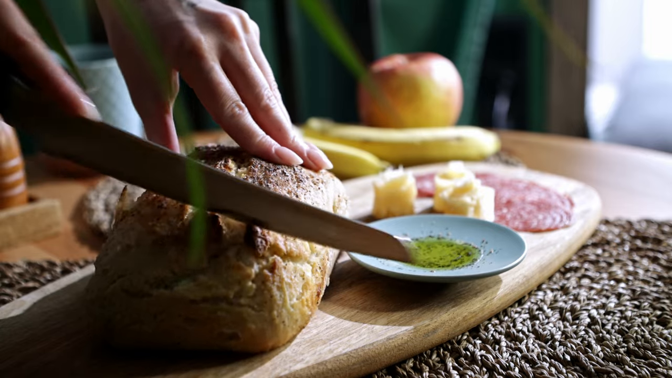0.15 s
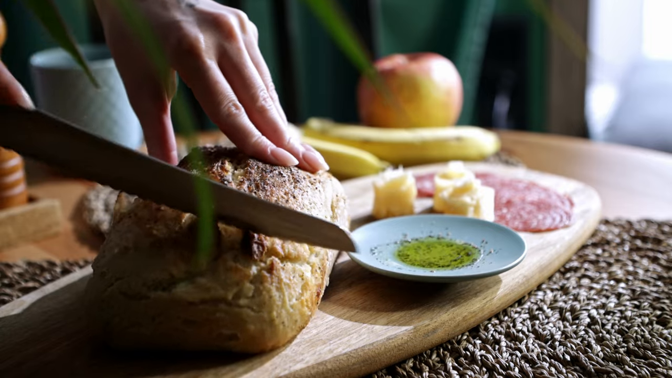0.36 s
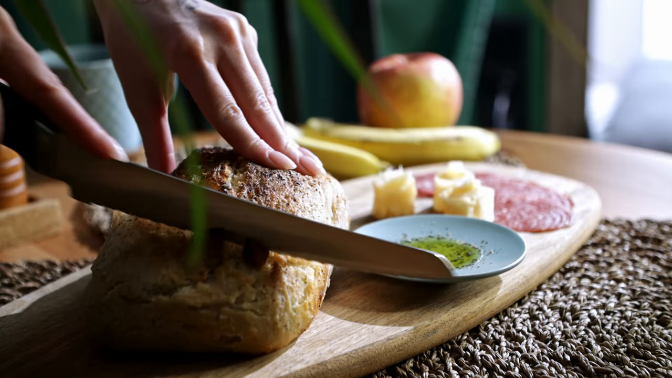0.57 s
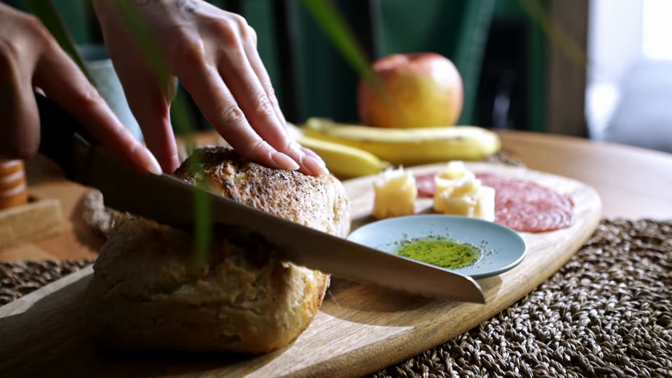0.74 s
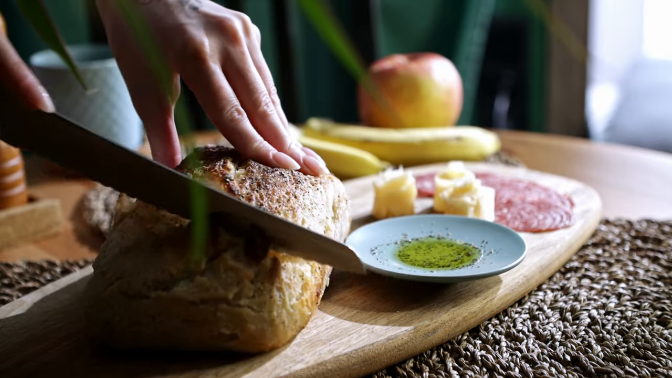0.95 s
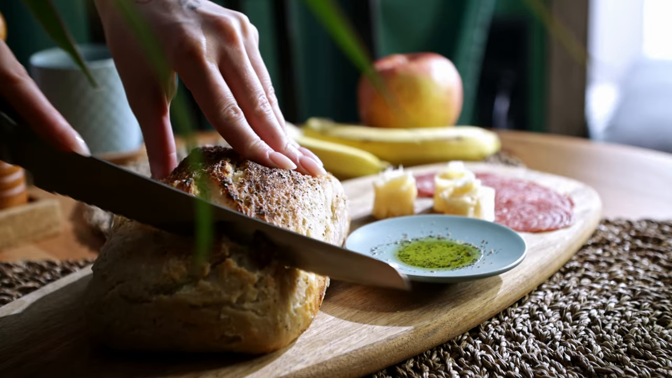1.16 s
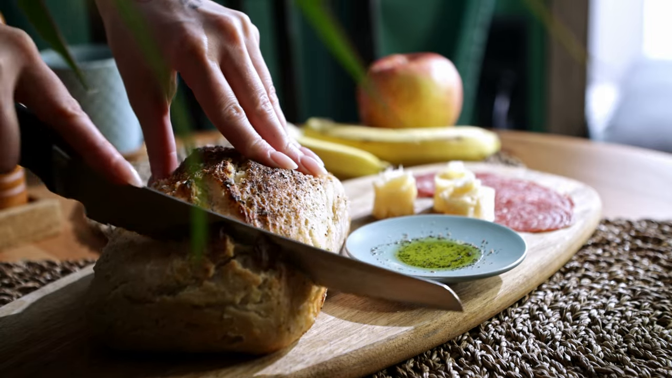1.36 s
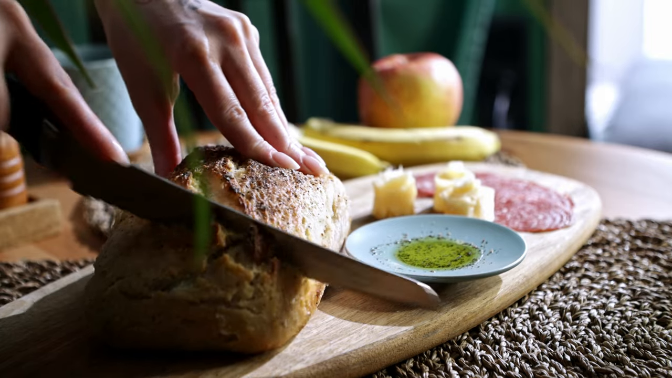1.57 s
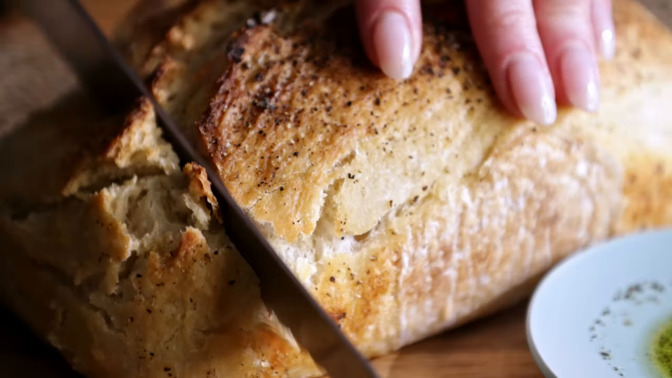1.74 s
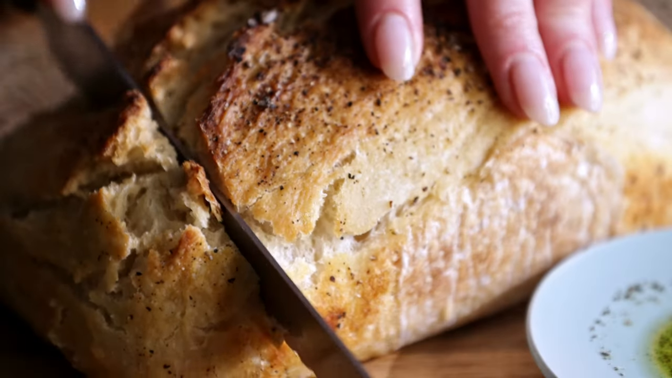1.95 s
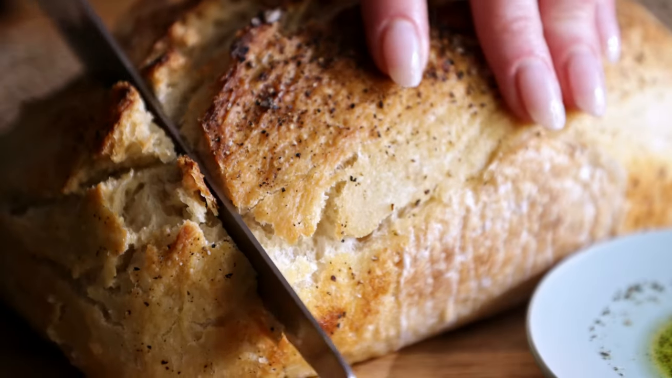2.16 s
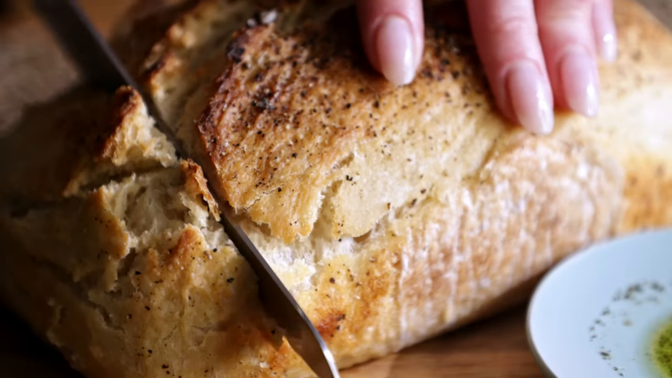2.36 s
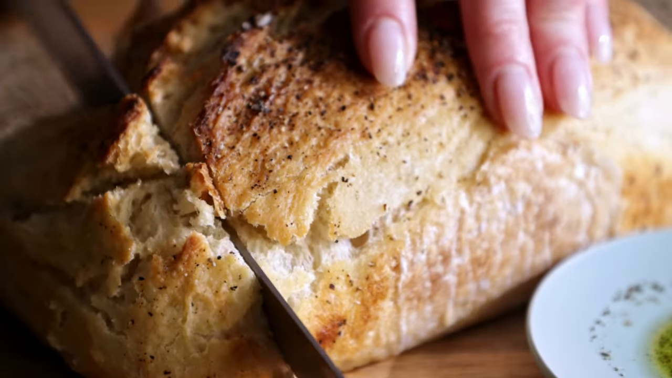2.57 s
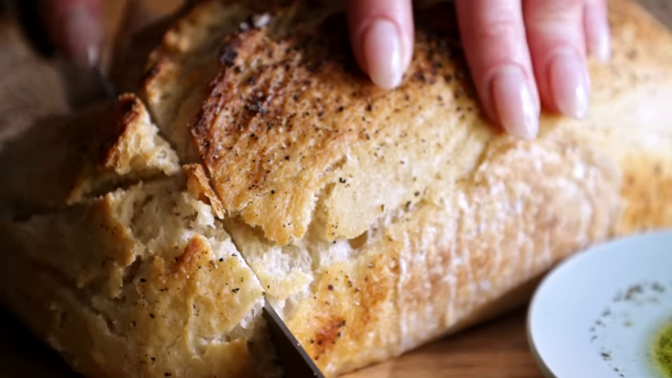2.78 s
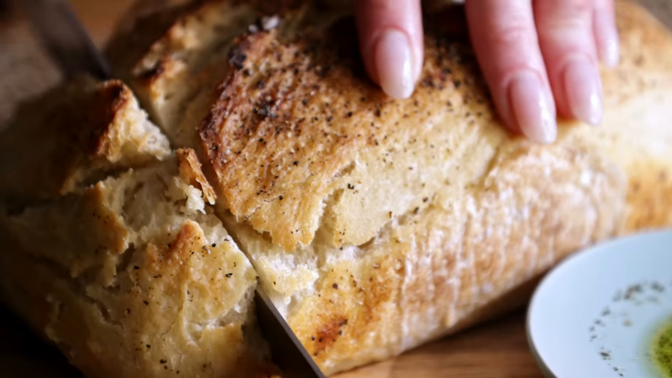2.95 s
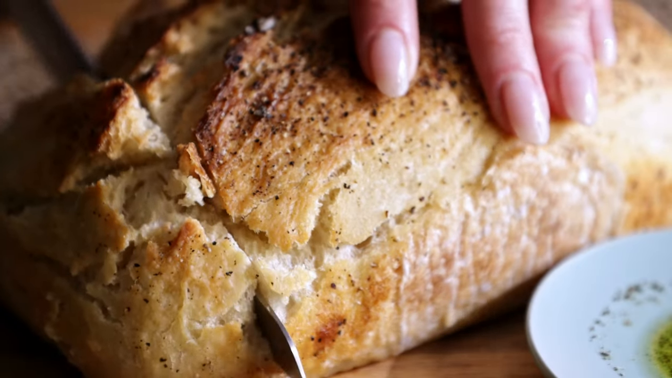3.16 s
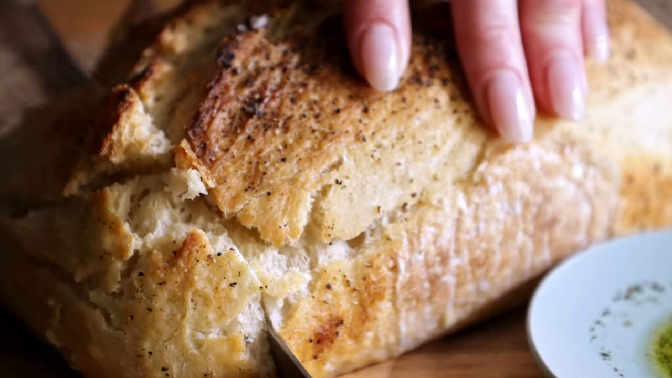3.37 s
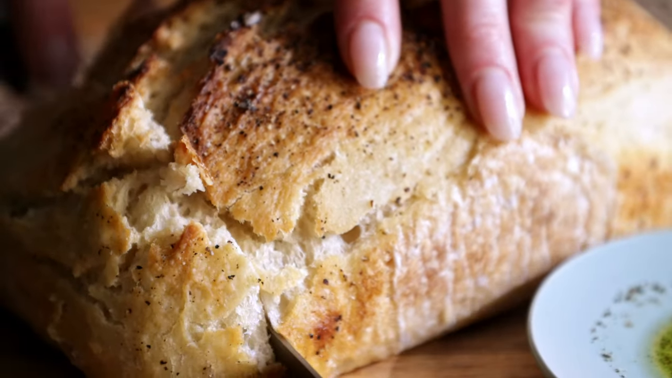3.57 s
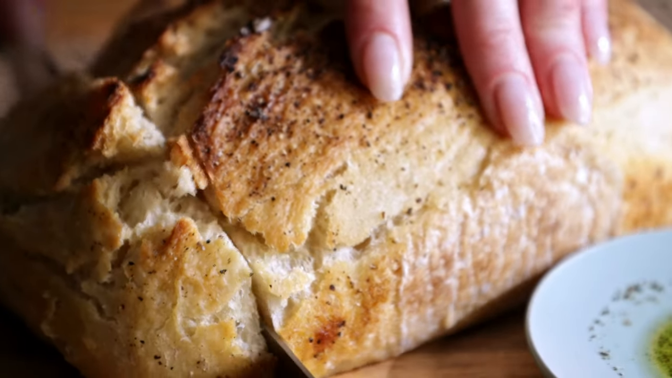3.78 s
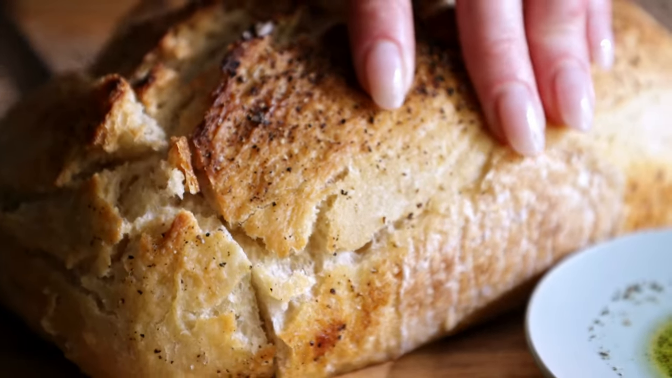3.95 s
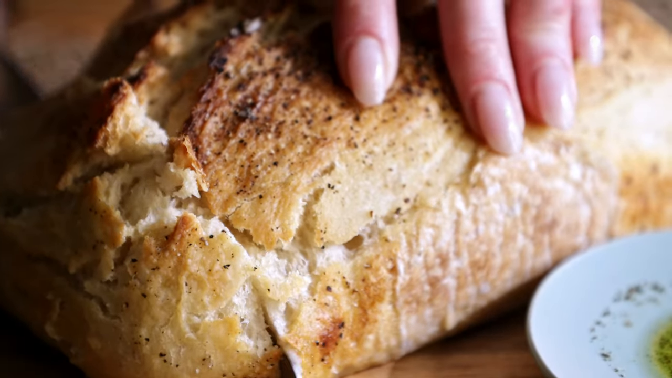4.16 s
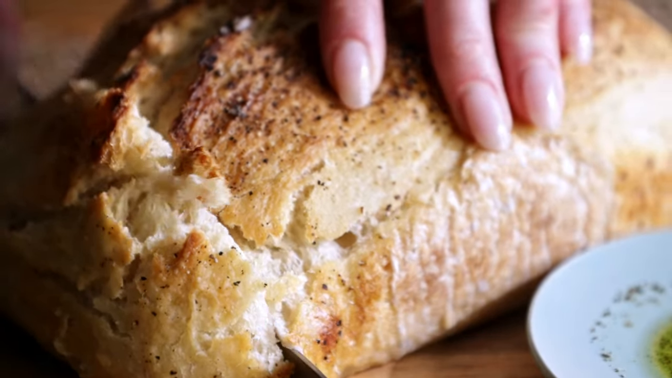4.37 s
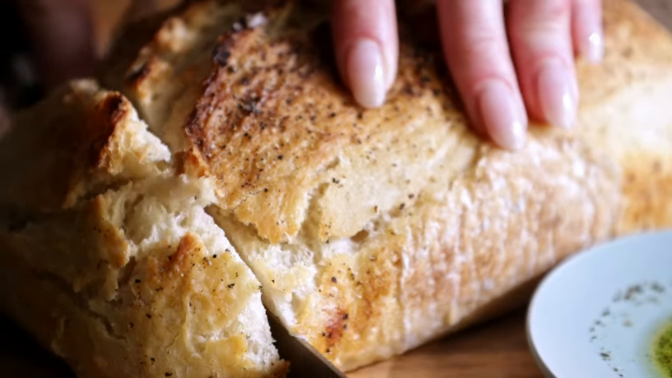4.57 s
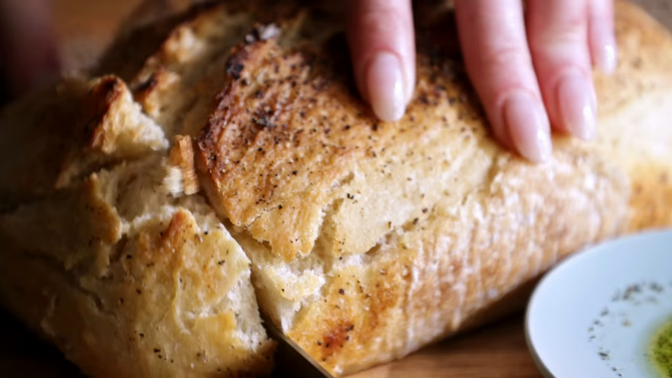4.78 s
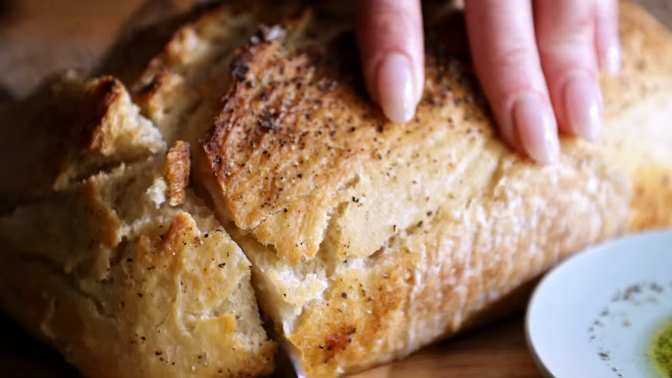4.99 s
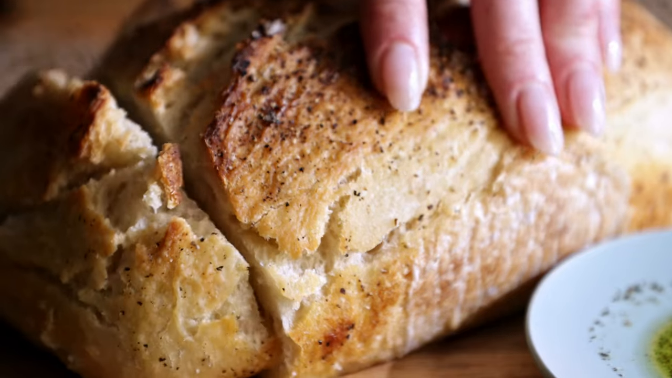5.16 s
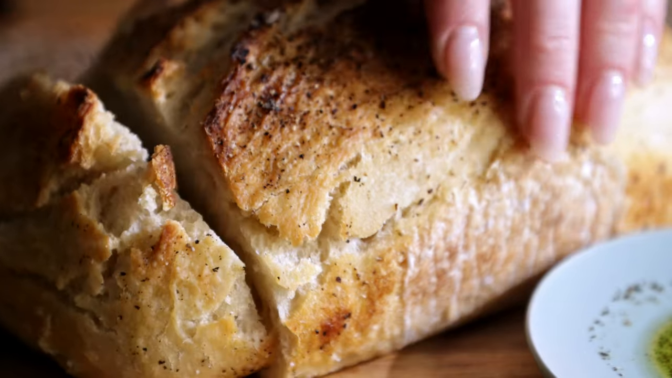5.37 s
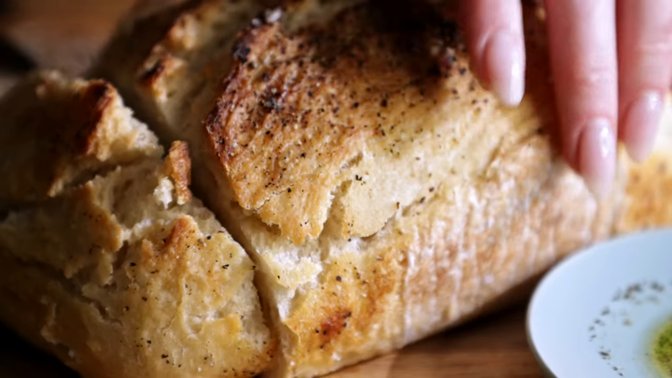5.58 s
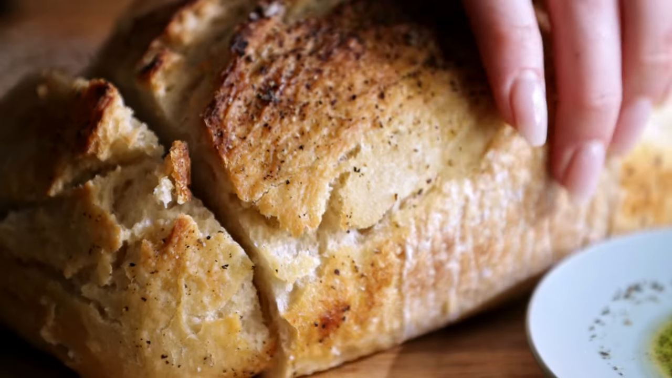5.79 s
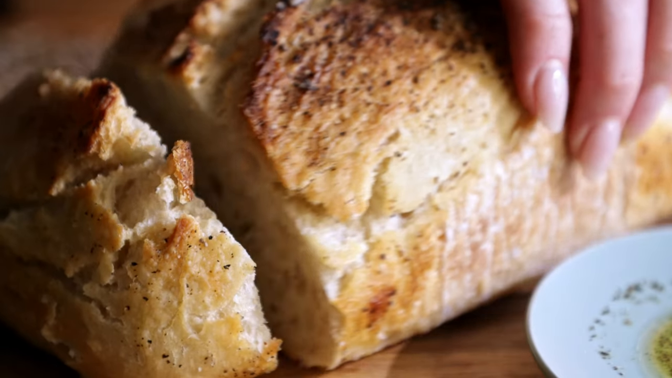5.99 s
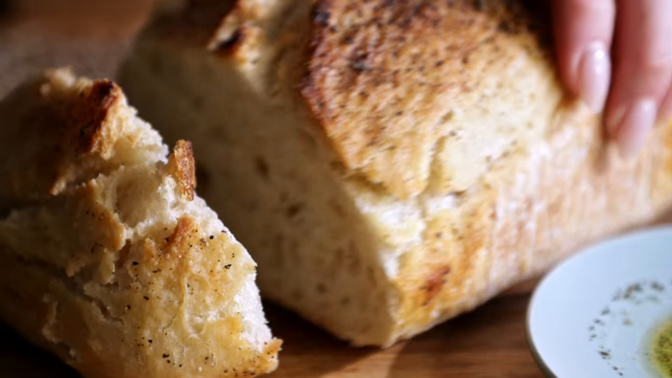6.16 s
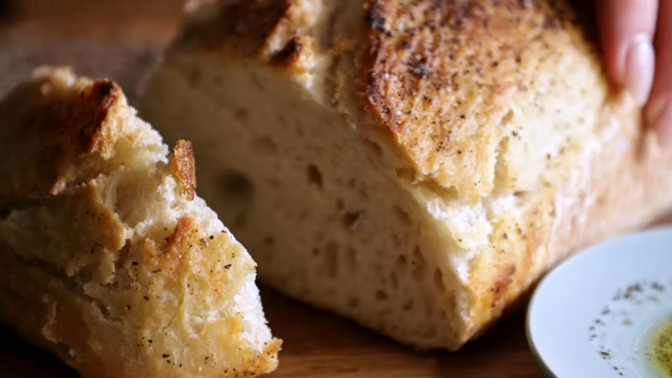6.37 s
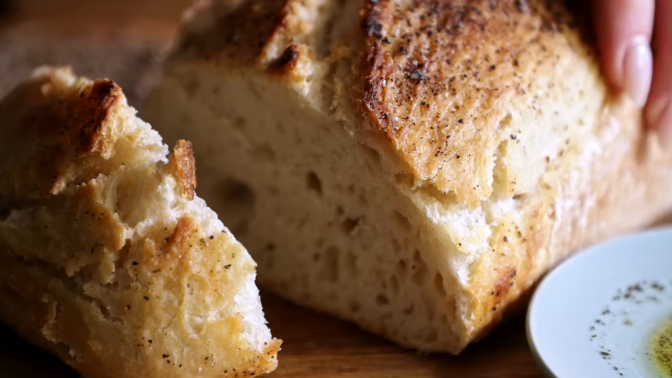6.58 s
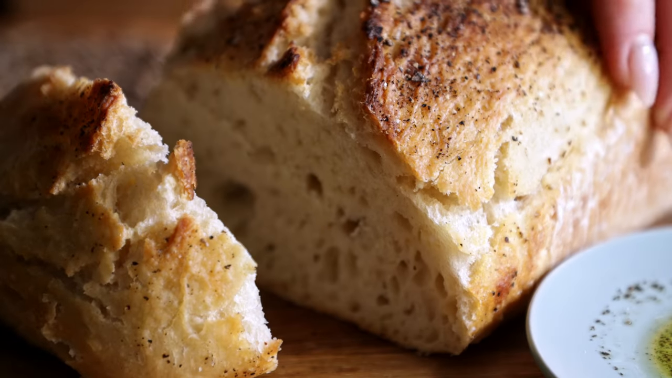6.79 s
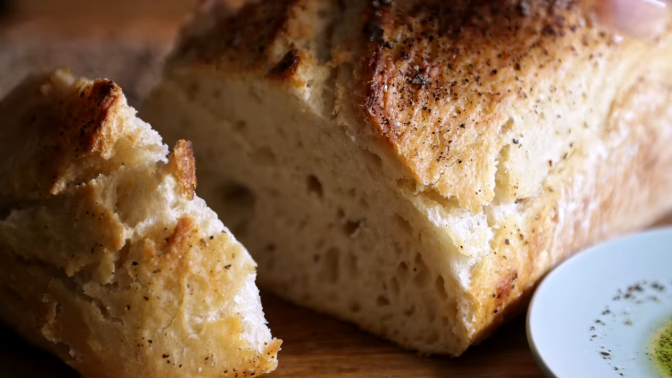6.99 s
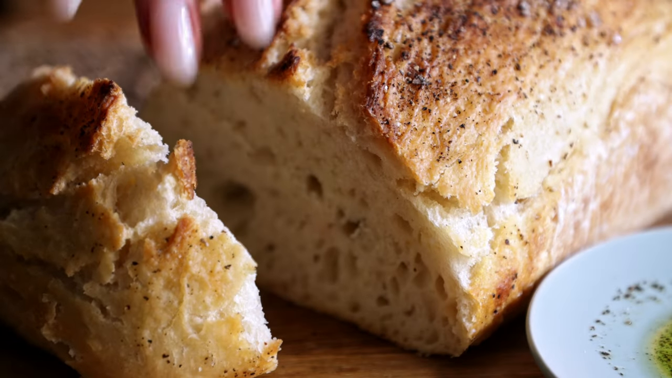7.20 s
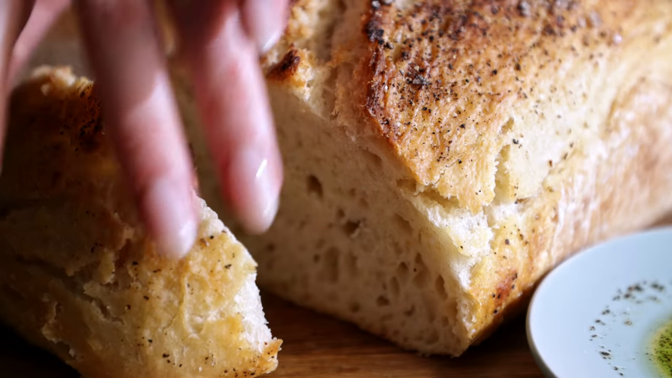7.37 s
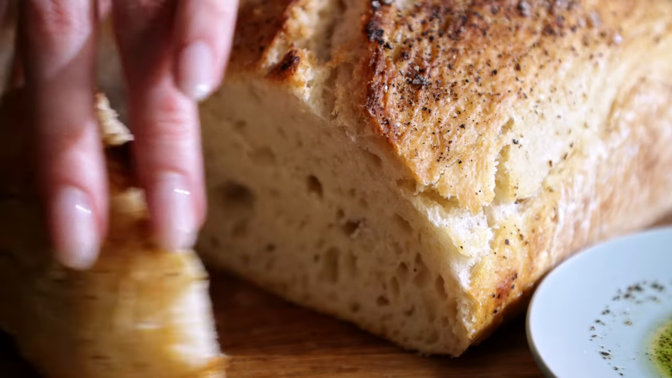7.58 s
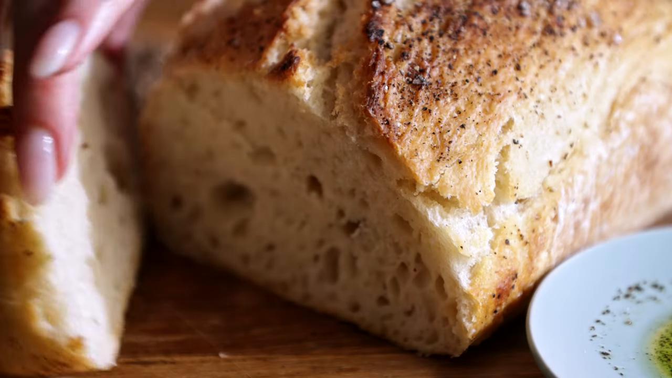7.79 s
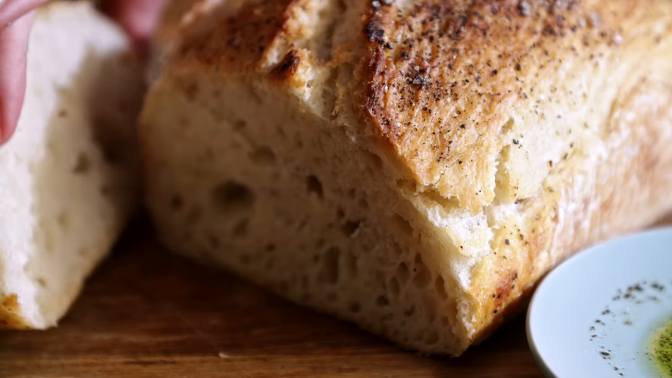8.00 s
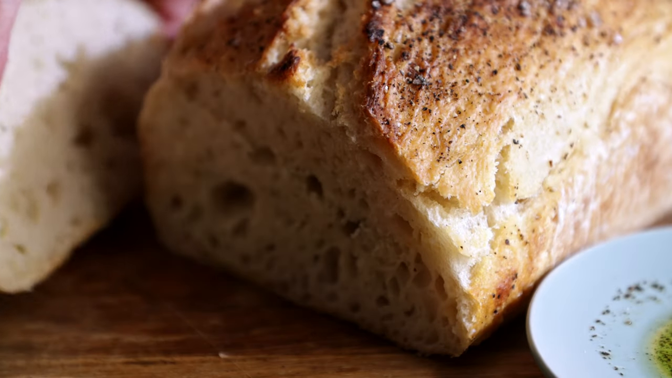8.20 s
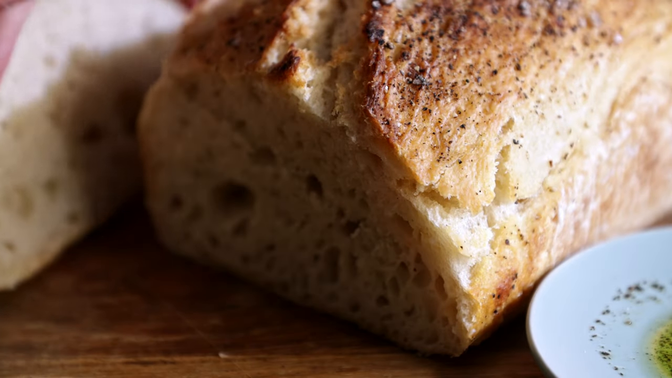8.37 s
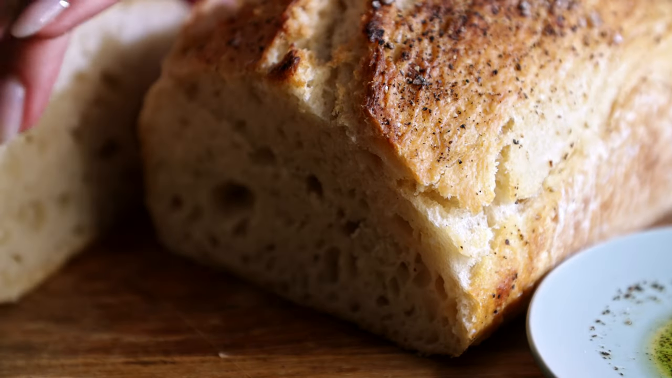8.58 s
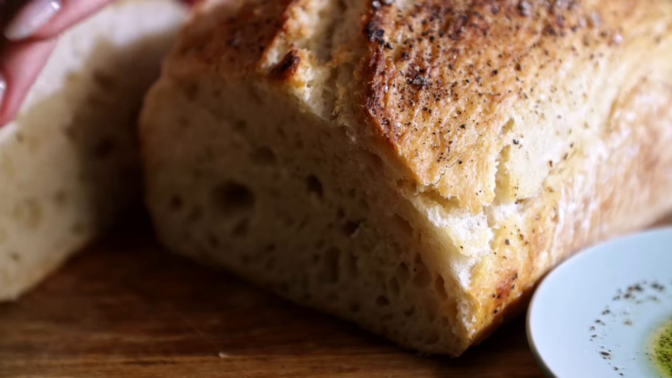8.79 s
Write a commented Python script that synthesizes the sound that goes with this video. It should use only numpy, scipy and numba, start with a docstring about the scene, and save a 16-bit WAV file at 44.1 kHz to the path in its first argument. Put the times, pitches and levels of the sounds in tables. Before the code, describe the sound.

Rasping saw strokes and sharp crust snaps cut a crusty loaf, ending in a wooden knock and light scrapes in a quiet kitchen.

```python
"""A serrated knife saws through a crusty loaf on a wooden board: stick-slip breaks excite resonances of
crust, crumb, board and blade, and brittle crust snaps in short bursts. Modal impacts make the chinks of the
blade and the knocks of knife and bread on the wood; softer friction makes the slides of the cut piece.
A distant engine hums as a sum of sine orders of one slow cycle, over coloured noise for the room air.
The small kitchen answers with a short tail of decaying noise."""
import sys
import numpy as np
from scipy import signal
from scipy.fft import rfft, irfft
from scipy.io import wavfile
from scipy.ndimage import uniform_filter1d
from numba import njit

SR = 44100
rng = np.random.default_rng(int(sys.argv[2]) if len(sys.argv) > 2 else 0)


def wav_out(sig):
    """Save sig, one row per channel (or a flat mono array), as 16-bit PCM at SR to the path in sys.argv[1]."""
    wavfile.write(sys.argv[1], SR, np.round(np.clip(np.atleast_2d(sig).T, -1, 1) * 32767).astype(np.int16))


N = 389844
TIME = np.arange(N) / SR
STEP = 16   # slow signals are made at every 16th sample

# knife strokes: (three envelope times [s], near the start, peak and end of a gesture; not always in that order,
# depth at the first time [dB], depth at the third time of rasp, crackle and song [dB],
# depth at the third time of shake and crumb [dB],
# levels of rasp, board shake, crumb, crisp crackle and blade song [dB],
# rasp pitch at the first time [Hz], rasp pitch at the third time [Hz], rasp width [Hz], crumb pitch [Hz],
# board pitch [Hz], unevenness of the breaks [dB])
STROKES = [(0.0, -0.008, 0.1, -1, 9.5, 3.5, -43.5, -52, -58.5, -41, -63, 3520, 3800, 890, 1480, 326, 2.5),
           (0.178, 0.292, 0.35, 7, 3.5, -1, -42, -54.5, -56.5, -51.5, -49, 3320, 3560, 700, 1530, 229, 6),
           (0.442, 0.73, 0.82, 3.5, 8, 7.5, -44.5, -46, -54.5, -45, -63, 3540, 3400, 1180, 1560, 264, 4),
           (0.899, 0.97, 1.041, 4.5, 5, 2.5, -46.5, -57, -66, -51.5, -53, 3400, 3580, 704, 1630, 310, 3),
           (1.165, 1.303, 1.545, 6, 5, 9.5, -45, -48, -46.5, -45.5, -59, 3440, 3600, 1220, 1500, 310, 5.5),
           (1.669, 1.825, 1.943, 7, 2.5, 0.5, -44.5, -46, -48.5, -45, -67, 3700, 3600, 2000, 2050, 310, 5),
           (2.05, 2.127, 2.327, 8, 7, 4.5, -53, -53.5, -59, -53, -56, 3340, 3550, 900, 1550, 420, 4),
           (2.496, 2.542, 2.6, 8.5, 24, 20, -49, -52.5, -55, -66, -58, 3580, 3630, 900, 1930, 420, 6),
           (2.61, 2.873, 2.81, 4, -7, 3, -48, -50.5, -51, -55.5, -62, 3400, 3600, 2190, 1540, 335, 5.5),
           (2.93, 2.96, 3.03, 4, 1.5, 0.5, -59, -57, -59.5, -66, -69.5, 3530, 3560, 890, 1720, 304, 3.5),
           (3.113, 3.17, 3.2, 5.5, 9, 0, -55, -61.5, -63.5, -66, -72, 3040, 2830, 614, 1630, 300, 3.5),
           (3.33, 3.367, 3.32, 4, -4, 2, -58, -62.5, -60, -85, -82, 3830, 3780, 895, 1576, 200, 7),
           (3.447, 3.564, 3.742, 1.5, 13, 8.5, -52.5, -60, -53.5, -52, -75, 3430, 3350, 1170, 1518, 467, 4),
           (3.866, 3.993, 4.043, 2, 2, 13, -55, -56, -56.5, -63, -63, 3000, 4300, 1900, 1600, 517, 4),
           (4.185, 4.326, 4.53, 17, 5.5, 1.5, -53.5, -57.5, -57.5, -55.5, -60, 2910, 3140, 704, 1600, 270, 4.5),
           (4.524, 4.589, 4.74, 5, 23.5, 20.5, -41.5, -40, -42, -52.5, -73, 3330, 3100, 626, 1540, 715, 2.0),
           (4.789, 4.88, 5.116, 10, 1, 1, -45, -52, -47.5, -61, -70, 2900, 2830, 400, 1560, 630, 2),
           (5.155, 5.267, 5.554, 4.5, 6, 19.5, -43.5, -61.5, -47, -74, -67, 3520, 3430, 380, 1470, 410, 2.5)]
# modes of the steel blade: (frequency [Hz], relative level [dB], decay time t60 at damping 1 [s])
BLADE = [(2860, -6, .15), (4230, -5, .15), (4915, -6, .12), (5190, -8, .08), (5949, -10, .08),
         (6935, -12, .2), (8856, -12, .1), (9335, -4, .25), (10070, -4, .07), (10560, 0, .22),
         (10910, -5, .12), (11970, -1, .15), (12500, -3, .1), (13390, -2, .15), (13750, -4, .1),
         (14630, -7, .08)]


def amp(db):
    """A level in decibels is twenty times the logarithm of an amplitude ratio."""
    return 10 ** (np.asarray(db) / 20)


def rms_one(x):
    """Dividing by the root mean square gives a signal unit effective value."""
    return x / np.sqrt(np.mean(x ** 2) + 1e-20)


def in_time(rows):
    """Linear interpolation turns rows of (time, values...) into one curve per value."""
    s, *columns = np.transpose(rows)
    return [np.interp(TIME, s, c) for c in columns]


def slow_chance(rate):
    """Low-pass filtering by a double pole turns white noise into a slow random signal of spread 1."""
    r = np.exp(-2 * np.pi * rate * STEP / SR)
    noise = rng.standard_normal(N // STEP + 4002)
    slow = signal.lfilter([1], [1, -2 * r, r * r], noise)[4000:]   # the filter has settled by then
    return rms_one(slow - slow.mean())


def at_full_rate(slow):
    """Linear interpolation brings a slow signal to the full sample rate."""
    return np.interp(np.arange(N) / STEP, np.arange(N // STEP + 2), slow)


def drift(rate):
    """A low-passed random signal of spread 1 models an irregular motion."""
    return at_full_rate(slow_chance(rate))


def swell(spread_db, rate):
    """Random modulation in decibels makes a gain that wanders about 1."""
    return at_full_rate(amp(spread_db * slow_chance(rate)))


def ring(clicks, hz, t60):
    """Impulse response of a damped oscillator: a unit click starts a decaying sine of initial height 1."""
    r, w = amp(-60 / (t60 * SR)), 2 * np.pi * hz / SR
    return signal.lfilter([0, np.sin(w)], [1, -2 * r * np.cos(w), r * r], clicks + 1e-18)


@njit
def gliding(x, cosine, r):
    """Time-varying resonance: a two-pole filter whose centre and width move, passed twice."""
    out = x.copy()
    for _ in range(2):
        y1 = y2 = x1 = x2 = 0.
        for i in range(len(x)):
            y = (1 - r[i] ** 2) / 2 * (out[i] - x2) + 2 * r[i] * cosine[i] * y1 - r[i] ** 2 * y2
            x2, x1, y2, y1 = x1, out[i], y1, y
            out[i] = y
    return out


def resonances(x, peaks, moving_hz=None, width_hz=300, moving_db=0):
    """Modal superposition: parallel resonances of alternating sign, the fixed ones wandering in level; rms 1."""
    out = 0
    if moving_hz is not None:
        cosine = np.cos(2 * np.pi * moving_hz / SR)
        radius = np.exp(-np.pi * width_hz / SR) * np.ones(N)
        out = amp(moving_db) * gliding(x, cosine, radius)
    for k, (hz, width, db) in enumerate(peaks):
        r = np.exp(-np.pi * width / SR)
        top = [(1 - r * r) / 2, 0, (r * r - 1) / 2]
        bottom = [1, -2 * r * np.cos(2 * np.pi * hz / SR), r * r]
        wander = swell(2.36, 6.3)   # the contact shifts
        out = out + (-1) ** k * amp(db) * wander * signal.lfilter(top, bottom, x)
    return rms_one(out)


def grains(per_s, spread_db, bed_db):
    """Stick-slip as a random point process: uneven breaks over fine friction noise, of evened power."""
    sizes = amp(spread_db * np.minimum(rng.exponential(1, N), 4)) * rng.choice([-1, 1], N)
    breaks = sizes * (rng.random(N) < per_s / SR)
    breaks = breaks + amp(bed_db) * rng.standard_normal(N)
    return breaks / np.sqrt(uniform_filter1d(breaks ** 2, size=SR // 4))


def shape(time_1, time_2, time_3, depth_1_db, depth_3_db):
    """Envelope of one gesture, interpolated in decibels through three times, with an outer edge on each side."""
    before_s, after_s, edge_db = 0.056, 0.099, 18.5
    times = [time_1 - before_s, time_1, time_2, time_3, time_3 + after_s, time_3 + 2 * after_s]
    levels = [-depth_1_db - edge_db, -depth_1_db, 0, -depth_3_db, -depth_3_db - edge_db, -60]
    return amp(np.interp(TIME, times, levels, left=-200, right=-200))


def contact():
    """Friction drives each body by its own gain: five gains, then pitches, width and unevenness."""
    # light drags of the loaf over the board:
    # (three envelope times [s], near the start, peak and end of a gesture; not always in that order)
    drags = [(5.75, 6.302, 6.9), (6.767, 6.89, 7.24), (7.306, 7.603, 8.1), (8.25, 8.406, 8.4)]
    # levels of a drag: (rasp [dB], board shake [dB], crumb [dB], crisp crackle [dB], blade song [dB])
    drag_db = (-76.5, -71.5, -74.5, -77, -98)
    # nudges of the cut piece on the wood: (time [s], rasp [dB], board shake [dB], crumb [dB],
    # crisp crackle [dB], rasp pitch [Hz], rasp width [Hz], crumb pitch [Hz])
    nudges = [(7.272, -63, -63, -65.5, -66, 3400, 700, 1900), (7.53, -74, -60, -85, -64, 3500, 800, 1750),
              (7.659, -46, -57, -59.5, -52.5, 3200, 550, 1800),
              (7.742, -53.5, -63, -73, -56, 3300, 800, 1750), (7.81, -58, -67, -67, -66, 3000, 400, 1600),
              (7.909, -56.5, -68, -62, -66, 2950, 300, 1800),
              (7.993, -50.5, -66.5, -51.5, -65, 2950, 450, 1720),
              (8.095, -65, -78, -67, -84, 3000, 300, 1720), (8.262, -66, -70, -66, -76, 3300, 1500, 1500),
              (8.292, -57, -62, -61, -70, 3050, 400, 1550), (8.368, -59.5, -71, -66, -70, 2900, 900, 1700),
              (8.44, -64.5, -68, -72, -75, 3050, 400, 1750)]
    drag_depth_db = 4
    rise_s, fall_s, edge_db = 0.047, 0.041, 19.5   # a nudge rises and falls by edge_db in these times
    slid_rasp_hz, slid_width_hz = 3003, 320
    slid_crumb_hz = 1744   # the cut piece rings a little higher than the loaf
    slid_board_hz, slid_uneven_db = 270, 3.5

    gains, colour = np.zeros((5, N)), []
    for (time_1, time_2, time_3, depth_1_db, treble_depth_db, body_depth_db, *levels,
         first_hz, third_hz, width_hz, crumb_hz, board_hz, uneven_db) in STROKES:
        treble = shape(time_1, time_2, time_3, depth_1_db, treble_depth_db)
        body = shape(time_1, time_2, time_3, depth_1_db, body_depth_db)
        gains += amp(levels)[:, None] * [treble, body, body, treble, treble]
        for s, hz in [(time_1, first_hz), (time_3, third_hz)]:
            colour.append((s, hz, width_hz, crumb_hz, board_hz, uneven_db))

    gains += amp(drag_db)[:, None] * sum(shape(*times, drag_depth_db, drag_depth_db) for times in drags)
    colour.append((drags[0][0], slid_rasp_hz, slid_width_hz, slid_crumb_hz, slid_board_hz, slid_uneven_db))

    for s, *levels in np.array(nudges)[:, :5]:
        near = slice(round((s - .2) * SR), round((s + .2) * SR))
        ahead = TIME[near] - s
        envelope = amp(-edge_db * np.maximum(-ahead / rise_s, ahead / fall_s))
        gains[:4, near] += amp(levels)[:, None] * envelope
    colour += [(row[0], *row[5:], slid_board_hz, slid_uneven_db) for row in nudges]
    return gains, *in_time(colour)


def blade_song():
    """Friction-excited modes: rubbing rings the high modes of the blade, now one, now another; rms 1."""
    rub = grains(500, 5.0, -5.0) * swell(5.1, 30.0)
    return rms_one(sum(swell(5.0, 7.0) * ring(rub, hz, 0.018) for hz, db, t60 in BLADE if hz > 5500))


def sawing(gains, rasp_hz, rasp_width_hz, crumb_hz, board_hz, uneven_db):
    """Stick-slip excitation: teeth catch in clumps; coarse breaks shake board and crumb, fine ones rasp."""
    # fixed resonances of board, crumb, rasp and crackle: (centre [Hz], width [Hz], relative level [dB])
    board_peaks = [(135, 50, -8), (205, 70, -3), (270, 70, -4), (400, 120, -5), (590, 120, -4),
                   (780, 120, -7)]
    crumb_peaks = [(1004, 97, -2.5), (1226, 480, -7.5), (1710, 50, -1)]
    rasp_peaks = [(2900, 200, 1.5), (3080, 136, 1), (3500, 800, -3), (4100, 900, -11), (4600, 110, -3.5),
                  (4880, 2400, -9.5), (5960, 200, -9)]
    crackle_peaks = [(5700, 370, -1), (7440, 1800, -4), (10040, 5800, -1.5), (13800, 2600, 0),
                     (15260, 1200, -2)]
    rasp_gain, shake_gain, crumb_gain, crisp_gain, song_gain = gains

    crumb_hz = crumb_hz * swell(0.2, 4.0)
    rasp_hz = rasp_hz * swell(0.35, 9.0)
    rasp_width_hz = np.maximum(rasp_width_hz, 100)
    uneven_db = np.clip(uneven_db, 0, 7)
    catch = amp(uneven_db * (0.35 * drift(63) + 0.45 * drift(210)))
    coarse = catch * grains(700, uneven_db, -8)
    fine = catch * grains(1500, 0.85 * uneven_db, 0.5)
    brittle = catch * grains(650, 1.24 * uneven_db, -13.5)
    sing_db = 7.5 - uneven_db   # the smoother the contact, the clearer its moving resonances sing

    # the top of the crackle fades by 1 dB per second as the blade sinks into the loaf
    crackle = resonances(0.38 * fine + brittle, crackle_peaks)
    lower = signal.sosfiltfilt(signal.butter(2, 10500, fs=SR, output="sos"), crackle)
    crackle = lower + (crackle - lower) * amp(-TIME)

    teeth = 0.42 * coarse + 0.81 * fine + 0.6 * brittle
    rasp = resonances(teeth, rasp_peaks, rasp_hz, width_hz=rasp_width_hz, moving_db=sing_db)
    crumb = resonances(coarse + 1.1 * fine, crumb_peaks, crumb_hz, width_hz=524, moving_db=sing_db - 1.5)
    crust = rasp_gain * rasp + crumb_gain * crumb

    # a dark gap between the ring of the crumb and the rasp; rough breaks fill it
    valley_hz, valley_width_hz = 2280, 550
    valley = signal.lfilter(*signal.iirpeak(valley_hz, valley_hz / valley_width_hz, fs=SR), crust)
    crust = crust - np.clip(1.1 - .19 * uneven_db, 0, .9) * valley

    # the table takes the push of the stroke
    push = signal.sosfilt(signal.butter(2, [45, 200], "band", fs=SR, output="sos"), swell(6.0, 21) * coarse)
    board = resonances(coarse, board_peaks, board_hz, width_hz=496, moving_db=7.5)
    shake = shake_gain * (amp(-12) * rms_one(push) + board)
    return shake + crust + crisp_gain * crackle + song_gain * blade_song()


def rumble():
    """Band-limited noise under slow modulation: a lumpy low rumble swells twice under the first strokes."""
    # swells: (three envelope times [s], near the start, peak and end of a gesture, level [dB])
    swells = [(0.0, 0.78, 0.9, -51.5), (1.12, 1.4, 1.56, -51.5)]
    level = sum(amp(db) * shape(*times, 6, 5.5) for *times, db in swells)
    low = signal.sosfilt(signal.butter(2, [115, 225], "band", fs=SR, output="sos"), rng.standard_normal(N))
    return level * swell(0.93, 5.6) * rms_one(low)


def air(spectrum, level_db):
    """Spectral shaping of white noise: steady noise of a given colour and effective level."""
    hz, db = np.transpose(spectrum)
    grid = np.maximum(np.arange(N // 2 + 1) * SR / N, 1)
    colour = amp(np.interp(np.log(grid), np.log(hz), db))
    return amp(level_db) * rms_one(irfft(rfft(rng.standard_normal(N)) * colour, N))


def room_air():
    """Stationary coloured noise, whose bass is weaker at first."""
    # spectrum of the air: (frequency [Hz], relative density [dB per Hz])
    air_spectrum = [(24, -76), (40, -30), (71, -16), (123, -8.5), (198, -14.5), (225, -19), (526, -26.5),
                    (728, -29), (1140, -30), (1580, -37.5), (1980, -35), (3520, -37.5), (15800, -47)]
    bass_hz, bass_from_s, early_bass_db = 110, 2.2, -28
    steady = air(air_spectrum, -60)
    upper = signal.sosfiltfilt(signal.butter(3, bass_hz, "high", fs=SR, output="sos"), steady)
    return upper + (steady - upper) * np.where(TIME < bass_from_s, amp(early_bass_db), 1)


def side_hiss():
    """Antiphase noise: a steady hiss for the side signal, of opposite sign in the two channels."""
    # spectrum of the hiss: (frequency [Hz], relative density [dB per Hz])
    hiss_spectrum = [(59, -67), (100, -20), (193, -5), (405, 2), (868, -3.5), (1600, -12), (5600, -8.5),
                     (15800, 2.5)]
    return air(hiss_spectrum, -77)


def engine():
    """Harmonic (Fourier) synthesis: orders of a slow cycle, each wavering in level and phase."""
    # levels of the hum: (time [s], ninth order [dB], the other orders in common [dB])
    hum_levels = [(1.72, -99, -77), (1.95, -56.5, -59.5), (2.9, -55.5, -58.5), (4.1, -54, -59),
                  (4.7, -55, -54.5), (5.2, -70, -60), (6.5, -60, -57), (7.7, -63.5, -56.5),
                  (8.84, -56.5, -58)]
    # speed of the cycle: (time [s], cycles per second [Hz])
    speed = [(1.9, 9.4), (3.5, 9.61), (5.9, 9.89), (8.84, 10.27)]
    # other orders: (order [cycles per engine cycle], level relative to their common level [dB])
    orders = [(8, -12), (10, -12), (11, -5), (12, -21), (13, 0), (14, -6.5), (15, -3.5), (16, -11.5),
              (18, -38), (19, -14.5), (20, -27), (21, -9.5)]
    s = np.arange(N // STEP + 2) * STEP / SR
    levels = np.array(in_time(hum_levels + [(s[-1], *hum_levels[-1][1:])]))
    ninth_db, others_db = levels[:, np.minimum(np.round(s * SR).astype(int), N - 1)]
    turn = 2 * np.pi * np.cumsum(np.interp(s, *np.transpose(speed))) * STEP / SR
    out = amp(ninth_db + 2.2 * slow_chance(3.0)) * np.sin(9 * turn + .4 * slow_chance(3.0))
    for order, db in orders:
        phase = order * turn + order ** 2   # the square sets the orders apart in phase
        out += amp(others_db + db + 1.7 * slow_chance(1.3)) * np.sin(phase + 0.78 * slow_chance(2.15))
    return signal.resample_poly(out, STEP, 1)[:N]


def snaps(crisp_gain):
    """Brittle fracture: a sharp break and ms of splinters give a treble tick and a crack ringing in crust."""
    # crust snaps: (time [s], peak level [dB], treble share, limited to 0.97 of full amplitude [dB])
    crust_snaps = [(0.014, -18, -2), (0.0865, -22, 2), (0.1687, -26, -2.5), (0.193, -25, -1),
                   (0.219, -26, -1.5), (0.238, -25.5, -21), (0.2752, -28.5, -3.5), (0.309, -26, -8),
                   (0.3578, -19.5, -0.5), (0.4265, -30, -3), (0.4355, -22, -2), (0.445, -16, 0),
                   (0.4832, -27, -3), (0.5214, -14, 3), (0.527, -24, -6), (0.542, -28, -6),
                   (0.566, -29, -4), (0.58, -26, -2), (0.613, -26, -3), (0.6285, -25, -2), (0.647, -25, -4),
                   (0.665, -26, -1), (0.7155, -20, 1), (0.739, -25, -1), (0.757, -24, 3), (.803, -27, 0),
                   (.82, -20, 8), (0.84, -20, 3), (1.003, -29, 1), (1.115, -29, -1), (1.1531, -13, -1),
                   (1.21, -27, -2), (1.237, -27, -3), (1.2728, -20, -1), (1.28, -23, -3), (1.296, -26, -2),
                   (1.309, -28, -2), (1.323, -27, -2), (1.333, -29, -8), (1.346, -19, -1),
                   (1.3875, -25, -3), (1.392, -20, -1), (1.42, -28, -2), (1.448, -18, -1.5),
                   (1.5, -25, -1.5), (1.527, -27, -1), (1.564, -16.5, -0.5), (1.57, -28, -4),
                   (1.666, -38, 0), (1.769, -21, 0), (1.806, -30, 0), (1.814, -25, -1), (1.8228, -20, -2.5),
                   (1.827, -21, -2), (1.865, -25, -1), (1.8723, -20, -3), (1.886, -26, 0), (1.906, -27, -2),
                   (1.913, -28, -2), (1.98, -34, 0), (2.065, -19, -1), (2.1106, -34, 2.5),
                   (2.1283, -14, -.1), (2.487, -31, -5), (2.5266, -23, -1.5), (2.557, -32, 1),
                   (2.6, -36, -8), (2.616, -29, -6), (2.621, -24, -4.5), (2.648, -22, -2), (2.654, -28, -4),
                   (2.707, -34, -9), (2.751, -27, -3), (2.754, -28, -3), (2.77, -28, -2), (2.829, -32, -6),
                   (2.852, -24, -3), (2.86, -18, -1), (2.892, -24, -2.5), (2.92, -30.5, 3),
                   (3.316, -36, -10), (3.452, -12.5, -.1), (3.494, -10.5, -.1), (3.539, -16, -1),
                   (3.5762, -17, -.1), (3.707, -24.5, -1.5), (3.85, -35, 0), (4.022, -30, -3.5),
                   (4.121, -38, 3), (4.158, -41, -3), (4.203, -42, -2), (4.239, -42, -6), (4.269, -43, -3),
                   (4.2821, -26, -1), (4.2885, -31, -3), (4.344, -35, -3), (4.376, -34, -6),
                   (4.417, -33, -12), (4.425, -24, -2), (4.5152, -24, -14), (5.156, -14.5, -6.5),
                   (5.5762, -39, -10), (5.852, -34, -0.5), (6.315, -51, -8), (6.565, -51, -11),
                   (6.6343, -38, -6), (6.6733, -31, -2), (7.5327, -40, -2), (7.642, -45, -5),
                   (7.748, -40, -2), (7.786, -39, -2)]
    length = 800
    out, t = np.zeros(N + length), np.arange(length) / SR

    # small snaps at random moments while sawing, most of them in the top crust, follow the crackle gain
    small = 120
    over_db, spread_db, small_treble_db = 7, -3.5, -3
    when = STROKES[-1][2] * rng.random(small) ** 1.6
    luck = rng.standard_normal(small)
    crackle_db = 20 * np.log10(crisp_gain[(when * SR).astype(int)] + 1e-9)
    peak_db = crackle_db + over_db + spread_db * luck
    breaks = [(s, db, small_treble_db) for s, db in zip(when, peak_db)] + list(crust_snaps)
    count = len(breaks)

    splinters, splinter_spread_db, splinter_t60_s = .17, 3, .013
    bursts = splinters * rng.standard_normal((count, length)) * amp(-60 * t / splinter_t60_s)
    bursts *= amp(splinter_spread_db * rng.standard_normal((count, 1)))
    bursts[:, 0] = -1   # the first break
    bursts = signal.lfilter(*signal.butter(2, 700, "high", fs=SR), bursts)   # too small to push bass

    clean = bursts * np.where(t > .0003, 0.45, 1)   # the treble has fewer splinters
    treble_filter = signal.butter(2, 4000, "high", fs=SR)
    flake_hz = rng.uniform(7250, 14700, count)   # each flake has a colour of its own
    ticks = [signal.lfilter(*treble_filter, one) + 0.13 * ring(one, hz, 0.0033)
             for one, hz in zip(clean, flake_hz)]
    bodies = [ring(one, hz, 0.0018) for one, hz in zip(bursts, rng.uniform(3100, 4500, count))]
    cracks = bodies + .5 * ring(bursts, 7050, 0.00085) + 0.56 * ring(bursts, 540, 0.0014)

    for (s, db, treble_db), tick, crack in zip(breaks, ticks, cracks):
        share = min(amp(treble_db), .97)
        snap = share * tick / np.abs(tick).max()
        snap = snap + np.sqrt(1 - share ** 2) * crack / np.abs(crack).max()
        at = round(s * SR)
        out[at:at + length] += amp(db) * snap / np.abs(snap).max()
    return out[:N]


def struck(blows, modes, scatter_db, rattle, rattle_s, rise_cycles):
    """Modal impact: a blow favours modes near its colour; a dying rattle of contacts roughens the ring."""
    out, t = np.zeros(N + SR), np.arange(SR // 3) / SR
    hz, db, t60 = np.transpose(modes)[:, :, None]
    chance = rng.standard_normal((len(blows), 2, len(modes), 1))
    rattles = rng.standard_normal((len(blows), len(t))) ** 3 * rattle * amp(-60 * t / rattle_s)
    for (s, peak_db, colour_hz, octaves, damping), (luck, sign), contacts in zip(blows, chance, rattles):
        off_colour_db = 6.9 * (np.log2(hz / colour_hz) / octaves) ** 2
        gain = np.sign(sign) * amp(db + scatter_db * luck - off_colour_db)
        sound = np.sum(gain * amp(-60 * t * damping / t60) * np.sin(2 * np.pi * hz * t), axis=0)
        sound *= 1 - np.exp(-t * colour_hz / rise_cycles)   # a dull, soft contact takes time
        contacts[0] = 1   # the blow itself
        sound = signal.fftconvolve(sound, contacts)
        at = round(s * SR)
        out[at:at + len(sound)] += amp(peak_db) * sound / np.abs(sound).max()
    return out[:N]


def blade_chinks():
    """Impact on thin steel: light touches ring the modes of the blade."""
    # touches: (time [s], peak level [dB], colour [Hz], colour width [octaves], damping factor [1])
    touches = [(.239, -33, 12800, 0.051, 2.1), (.520, -36, 13700, 0.16, 3),
               (5.631, -53.5, 10410, 0.31, 2.08), (5.632, -56, 5300, 0.28, 1.9),
               (5.648, -58, 9350, 0.11, 0.59), (5.819, -59, 12800, 0.71, 2.327),
               (6.633, -54, 3400, 0.23, 2.8), (6.673, -47.5, 3200, 0.54, 5.2), (6.676, -52, 11100, 1, 0.44),
               (6.72, -53.5, 11400, 0.53, 0.49)]
    return struck(touches, BLADE, scatter_db=2.0, rattle=.03, rattle_s=.2, rise_cycles=1.5)


def board_knocks():
    """Impact on wood: knife and bread strike the damped modes of the board."""
    # blows: (time [s], peak level [dB], colour [Hz], colour width [octaves], damping factor [1])
    blows = [(1.115, -34, 212, 1, 6.9), (1.743, -43, 620, 0.72, 0.93), (1.821, -31.5, 327, 0.43, 8.9),
             (1.857, -36, 385, 1, 5), (2.094, -41, 514, 0.64, 4.1), (2.523, -43, 420, 0.53, 4.5),
             (2.618, -36, 440, 0.9, 5), (2.645, -40.5, 394, 0.62, 5.4), (2.878, -26, 590, 1, 6.8),
             (3.555, -37, 547, 0.74, 1), (3.619, -31.5, 476, 0.61, 4.6), (3.674, -33.5, 423, 1, 4.8),
             (3.898, -39.5, 583, 0.53, 3.7), (6.332, -50, 560, 0.3, 3.7), (6.354, -39, 480, 0.6, 2.6),
             (6.37, -49, 310, 0.52, 2.3), (6.612, -45.5, 600, 0.2, 2.1), (6.6725, -25.5, 910, 0.9, 1.2),
             (6.69, -44, 310, 0.3, 1.2), (6.719, -37.5, 1000, 0.93, 2), (7.534, -34, 327, 0.99, 1.9),
             (7.67, -28.5, 321, 0.75, 3.7), (7.687, -42, 230, 0.44, 1.2), (7.749, -42.5, 255.5, 0.64, 2),
             (7.799, -45, 279, 0.91, 3.6)]
    # modes of the board: (frequency [Hz], relative level [dB], decay time t60 at damping 1 [s])
    board_modes = [(149, -29, 0.51), (201.7, 7, 0.26), (268.8, 2.5, 0.37), (323.4, 7, 0.15),
                   (402, 4.5, 0.11), (465, -1, 0.17), (572, 9, 0.1), (621, 10, 0.12), (655, 19, 0.027),
                   (810, 11.5, 0.035), (966, 4, 0.034), (1176, 6.5, 0.067), (1340, -8, 0.17),
                   (1940, 21.5, 0.045), (2050, -9, 0.079), (2330, 5, 0.062)]
    return struck(blows, board_modes, scatter_db=-0.5, rattle=0.0053, rattle_s=0.3, rise_cycles=1.06)


def room(x):
    """Diffuse reverberation by convolution: two noise tails, duller as they die, for middle and side."""
    t60_s = 0.15
    t = np.arange(SR // 2) / SR
    noise = rng.standard_normal((2, len(t)))
    dull = signal.lfilter([.35], [1, -.65], noise)
    tail = dull * amp(-60 * t / t60_s) + .5 * noise * amp(-120 * t / t60_s)
    tail = tail * (t > .003)
    return signal.fftconvolve(x[None], tail / np.sqrt(np.sum(tail[0] ** 2)), axes=1)[:, :N]


def scene():
    """Linear superposition in middle and side: the near sound leans left, a little wide, then is centred."""
    wide_until_s, lean_db, lean_above_hz = 1.72, 1.16, 250
    wide_db, room_db = -28, -14.5
    gains, *colour = contact()
    near = sawing(gains, *colour) + rumble() + snaps(gains[3]) + blade_chinks() + board_knocks()
    tail, side_tail = room(near)
    mid = near + amp(room_db) * tail + engine() + room_air()
    leaning = signal.lfilter(*signal.butter(1, lean_above_hz, "high", fs=SR), near)
    early_side = (amp(lean_db) - 1) / 2 * leaning + amp(wide_db) * side_tail
    side = (TIME < wide_until_s) * early_side + side_hiss()
    return np.array([mid + side, mid - side])


def record(dry):
    """Band limitation: a high-pass cuts the deep bass and a steep low-pass the top."""
    stop_hz = 16377   # from here up the low-pass rejects by 70 dB
    low = signal.sosfilt(signal.butter(3, 60, "high", fs=SR, output="sos"), dry)
    return signal.sosfilt(signal.cheby2(14, 70, stop_hz, fs=SR, output="sos"), low)


dry = scene()
out = record(dry)
wav_out(out)
```